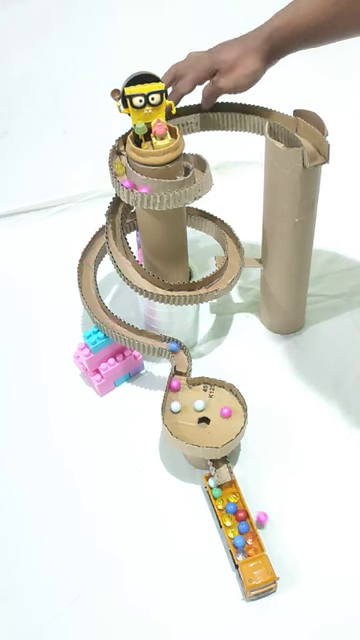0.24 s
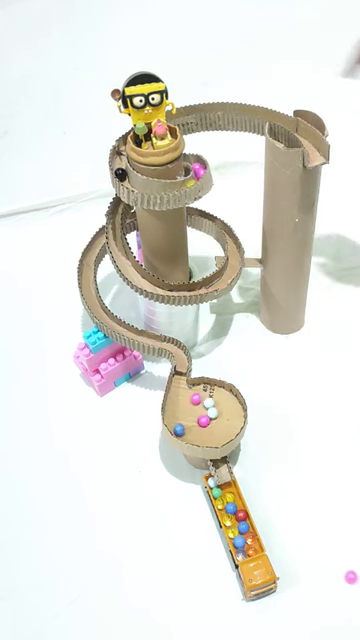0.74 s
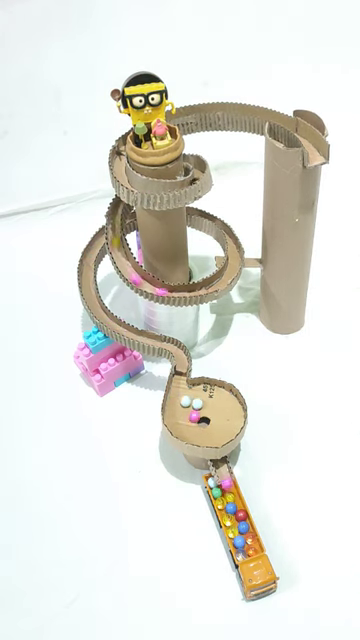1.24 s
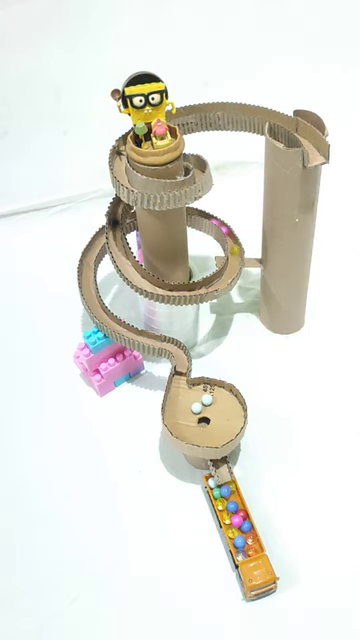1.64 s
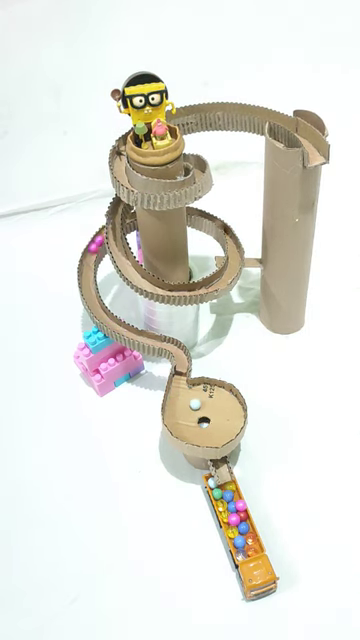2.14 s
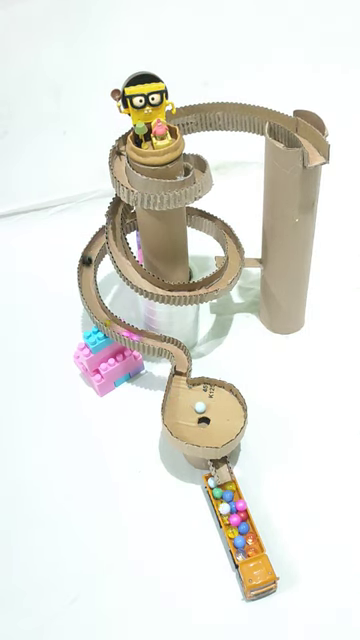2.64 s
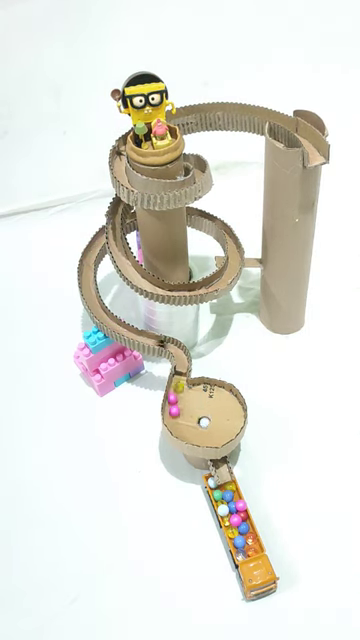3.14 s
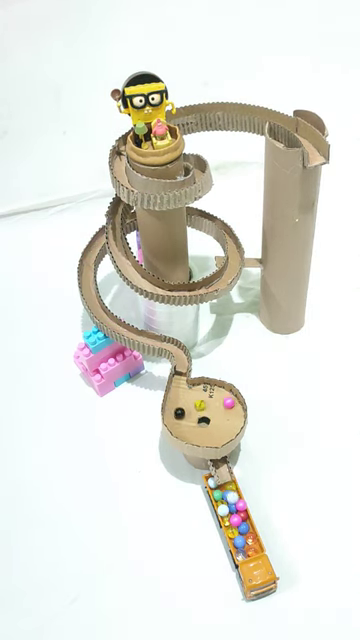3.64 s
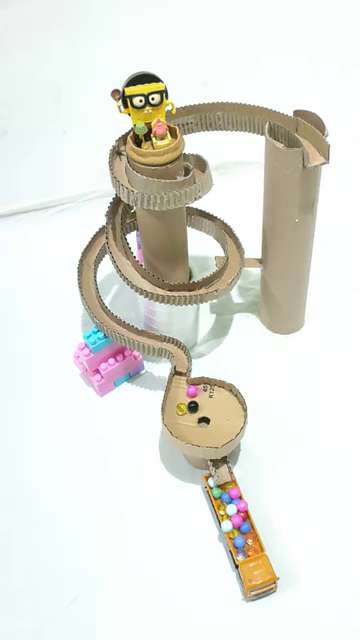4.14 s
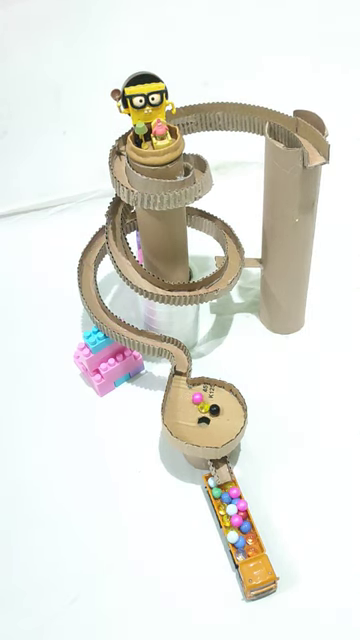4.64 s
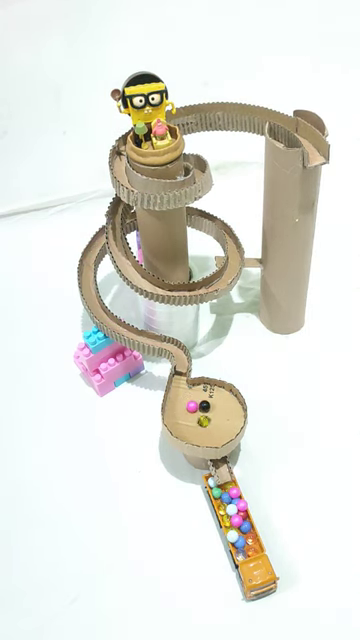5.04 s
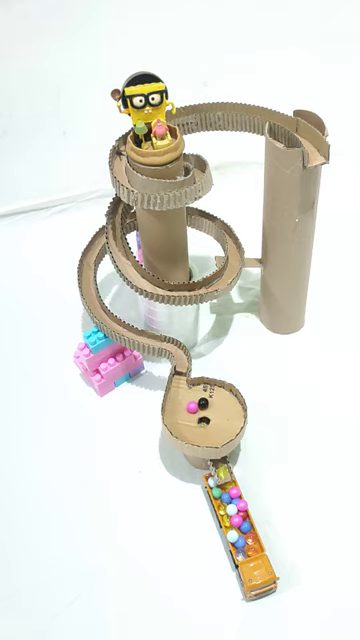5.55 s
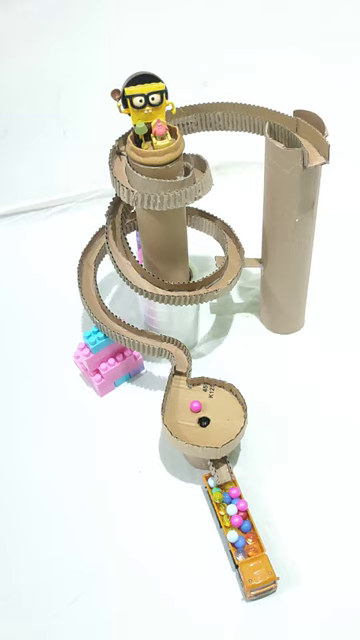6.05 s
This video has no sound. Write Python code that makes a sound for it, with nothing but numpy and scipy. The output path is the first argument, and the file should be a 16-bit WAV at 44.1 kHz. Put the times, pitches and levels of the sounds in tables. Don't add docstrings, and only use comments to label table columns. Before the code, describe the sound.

Bright marble clacks and rattles in a plastic toy truck, over soft cardboard rolling and bowl thumps that thin out in a bare, echoing room.

```python
import sys
import numpy as np
from scipy import signal
from scipy.fft import rfft, irfft, next_fast_len
from scipy.io import wavfile
from scipy.ndimage import uniform_filter1d

SR = 44100
rng = np.random.default_rng(int(sys.argv[2]) if len(sys.argv) > 2 else 0)


def wav_record(signal):
    frames = np.transpose(np.atleast_2d(signal))
    bounded = np.clip(frames, -1, 1)
    quanta = np.round(bounded * 32767).astype(np.int16)
    wavfile.write(sys.argv[1], SR, quanta)


def level_to_linear(level):
    exponent = np.asarray(level, float) / 20
    return 10 ** exponent


N = 276933

# [t/s, level/dB, truck bed share/dB, glass share/dB, share sent into the room/dB]
LANDINGS = [(0.0313, -9.5, -7.5, -9.5, -7.5), (0.1723, -15.5, -7, -15.5, -3), (0.2289, -12, -6, -9, -7),
            (0.2873, -13.5, -13.5, -13, -2.5), (1.4163, -11.5, -10.5, -10, -3),
            (1.4874, -11.5, -9.5, -13.5, -2.5), (1.6976, -9.5, -11, -9.5, -3.5),
            (1.9883, -14.5, -13, -10.5, -3), (2.0473, -14.5, -6.5, -9, -5), (2.1181, -14.5, -14, -12, -1),
            (2.625, -12, -12, -12, -6), (2.7309, -15.5, -9.5, -15, -2.5), (3.7474, -17.5, -9, -7, -4),
            (4.1023, -13.5, -16.0, -11.5, -3), (4.7144, -24.0, -27, -16, -2.5),
            (5.7396, -13.5, -22, -9.5, -3), (5.7945, -8, -14.5, -22, -6), (6.0142, -20, -18, -15.5, -4.5)]
# [t/s, level/dB, truck bed share/dB, glass share/dB]
BOUNCES = [(0.0587, -29, 1.5, -3), (0.1195, -18.0, -8, -15.5), (0.1827, -21.5, -7, -9),
           (0.2114, -23.5, -8.5, -12), (0.2421, -22.5, -6.5, -14.0), (0.2607, -17, -29, -19),
           (0.424, -27, -9.5, -14.5), (1.4393, -30.5, 2, -1), (1.523, -19.0, -9, -7.5),
           (1.538, -28, -8, -10.5), (1.57, -29.5, -6, -11), (1.5972, -24.5, -4.5, -9),
           (1.7192, -20.5, -12, -10), (1.759, -19, -17, -17), (1.7973, -19.5, -7.5, -16),
           (2.0901, -18.0, -13, -14), (2.6712, -17, -13, -11), (2.6942, -23.0, -9, -13),
           (2.8127, -31.5, -8, -11), (3.7733, -13, -16, -17.5), (3.8082, -24.5, -2.5, -3.5),
           (3.8586, -43, 0.5, -5.0), (4.1347, -16.5, -19, -12), (4.1604, -22, -8.5, -13),
           (4.1904, -16.5, -12.5, -20), (4.2259, -21.5, -10, -12), (4.8221, -36, -4, -13),
           (5.81, -18.5, -16, -15), (5.8233, -25.5, -16, -8.5), (5.9205, -35, 1.5, -15)]
# [t/s, level/dB]
RATTLES = [(0.11, -32.5), (0.1409, -37.0), (0.1561, -36.5), (0.1674, -14), (0.3107, -26), (0.3387, -24),
           (1.7409, -29), (2.0699, -28), (2.1345, -24), (2.1706, -33), (2.6373, -25), (2.7439, -32),
           (2.7654, -21), (2.7889, -38), (2.8406, -42.5), (3.7901, -33.5), (3.8017, -17.5), (3.8408, -17.5),
           (3.8947, -24.5), (4.1192, -18.5), (4.1485, -30.5), (4.1665, -20), (4.2078, -20), (4.261, -26),
           (5.754, -21), (5.8503, -35), (5.9523, -39.0), (6.054, -35)]
# [t/s, level/dB, cardboard share/dB]
KISSES = [(0.4, -26.5, -8), (0.656, -30.5, -13), (0.78, -31, -21), (0.7998, -39, -5), (1.124, -48.5, 10.5),
          (1.391, -39.5, 2), (1.67, -32.5, -15), (1.958, -33.5, -13), (2.381, -37.5, -10),
          (2.609, -45.5, -1.5), (3.0603, -38, -22.5), (3.486, -40.0, -8.5), (3.5224, -39, -28.5),
          (3.614, -41.5, -10), (3.718, -33.5, 2.5), (3.9885, -34.0, -10.5), (4.441, -38, -22),
          (4.5832, -45, -11), (5.162, -41, -9.0)]
# [t/s, level/dB]
GRAZES = [(0.5899, -54), (0.7511, -48), (0.9445, -45), (1.2531, -46), (1.3753, -40), (1.9359, -44.5),
          (2.37, -49), (2.4147, -45.5), (2.4587, -45), (2.5217, -51), (2.9999, -48), (3.3622, -47)]


def contacts():
    bounce_room_db, rattle_room_db, kiss_room_db, tick_room_db = -1.5, -4, -4, -4.5
    rows = [tuple(row) for row in LANDINGS]
    rows += [(*row, bounce_room_db) for row in BOUNCES]
    rows += [(s, db - 7.5, -13, -16.5, rattle_room_db) for s, db in RATTLES]
    rows += [(s, db + paper_db, -30, -11 - paper_db, kiss_room_db) for s, db, paper_db in KISSES]
    ticks = list(GRAZES)
    tick_late_s = 0.0013
    ticks += [(s + tick_late_s, db + tick_db) for s, db, _, tick_db in THUMPS]
    rows += [(s, db + 6, -9.5, -17.5, tick_room_db) for s, db in ticks]
    return np.transpose(rows)


# [f/Hz, level/dB, time to fade by 60 dB/s]
TRUCK_BED = [(1330, -3, .006), (1500, 1, .009), (1680, 2, .01)]
# [f/Hz, level/dB, time to fade by 60 dB/s]
TRUCK_WALLS = [(2000, -3, .004), (2400, -1, .004), (2850, 1, .0045), (3300, 0, .004), (3800, -2, .0035),
               (4400, -5, .003)]
# [f/Hz, level/dB, time to fade by 60 dB/s]
GLASS = [(5476, 0.5, 0.0022), (6350, 2, 0.0028), (6840, 4.5, 0.0021), (8710, -1.5, 0.0017),
         (9650, -3.5, 0.00089), (11210, -2, 0.0012), (12950, -1, 0.00095)]


def clacks():
    s, db, bed_db, glass_db, room_db = contacts()
    lasting = np.clip((db + 45) / 22, .45, 1)[:, None, None]
    hits = strike(s, db + bed_db + 2.5, TRUCK_BED, 2.2, 0.025, turns=0.63, lasting=lasting, room_db=room_db)
    hits += strike(s, db - 3.0, TRUCK_WALLS, 1.5, .03, turns=0.32, lasting=lasting ** .5, room_db=room_db)
    hits += strike(s, db + glass_db + 7.5, GLASS, 1.42, 0.026, turns=0.27, room_db=room_db)
    towards_phone_db, into_room_db = 0, -6
    snaps = cracks(s, db - 11) * level_to_linear([[towards_phone_db], [into_room_db]])
    return steep(hits, 1197, 20000) + snaps


def cracks(times, peak_db):
    fade_s = .0012
    starts = np.zeros(N)
    np.add.at(starts, (times * SR).astype(int), level_to_linear(peak_db))
    fade = signal.lfilter([1], [1, -np.exp(-1 / (fade_s * SR))], starts)
    return band(fade * rng.standard_normal(N), 4200, 3.8)


def strike(times, peak_db, modes, scatter_db, detune, favour_db=0, turns=2, lasting=1, room_db=0, flip=np.pi):
    hz, db, t60 = np.transpose(modes)[:, None, :, None]
    t = np.arange(int(min(t60.max(), .15) * SR)) / SR
    chance = rng.standard_normal((len(times), len(modes), 3))
    gain = level_to_linear(db + favour_db + scatter_db * chance[..., :1])
    pitch = hz * (1 + detune * chance[..., 1:2])
    phase = 2 * np.pi * pitch * t + turns * chance[..., 2:]
    phase += flip * np.arange(len(modes))[:, None]
    fade = np.exp(-np.log(1000) * t / (t60 * lasting))
    blows = (gain * fade * np.sin(phase)).sum(axis=1)
    blows *= (level_to_linear(peak_db) / np.abs(blows).max(axis=1))[:, None]
    out = np.zeros((2, N + len(t)))
    for s, blow, wet in zip(times, blows, level_to_linear(room_db + 0 * times)):
        start = int(s * SR)
        out[:, start:start + len(t)] += blow * np.array([[1], [wet]])
    return out[:, :N]


def band(x, hz, octaves):
    edges = hz * 2 ** (np.array([-.5, .5]) * octaves)
    edges = np.minimum(edges, SR / 2 * .95)
    return signal.sosfilt(signal.butter(2, edges, "band", fs=SR, output="sos"), x)


def steep(x, lo_hz, hi_hz):
    return signal.sosfilt(signal.butter(5, [lo_hz, hi_hz], "band", fs=SR, output="sos"), x)


# [t/s, level/dB, strongest f/Hz, contact tick against the bump/dB]
THUMPS = [(0.016, -40, 581.0, -9.0), (0.119, -40.5, 651.0, -11), (0.156, -42, 576.0, -19),
          (0.352, -31.5, 571.0, -17.5), (0.536, -41, 624.0, -28), (0.553, -32, 574, -8),
          (0.593, -51.5, 571.0, -6), (0.672, -49, 627.0, -20.5), (0.827, -56, 581.0, 2),
          (0.906, -52, 560.0, -9), (0.985, -30.0, 659.0, -8.5), (1.129, -47.5, 587.0, -12),
          (1.191, -47, 565.0, -22.0), (1.304, -30, 553, -4.5), (1.493, -30, 444.0, -12.5),
          (2.241, -33.5, 651.0, -10), (3.079, -30.5, 583, -7), (3.144, -39.5, 447.0, -18),
          (3.155, -33, 638.0, -6), (3.199, -39.5, 560, -7.5), (3.243, -35, 581.0, -7),
          (3.296, -29.5, 580, -13.5), (3.511, -32.5, 638.0, -12.5), (3.562, -35.5, 633.0, -6),
          (3.677, -41.5, 643.0, -8.5), (3.717, -30, 654.0, -11.5), (5.246, -35, 651.0, -10.5),
          (6.128, -56, 620, -19.5), (6.184, -32.5, 625, -13.5), (6.217, -43, 565.0, -9)]
# [f/Hz, level/dB, time to fade by 60 dB/s]
BOWL = [(369, -8, 0.027), (459.4, 4.5, 0.1), (530, 3, 0.032), (548, -2.5, 0.21), (602.5, -13.5, 0.037),
        (637, 9, 0.093), (715, -12.5, 0.15), (569, 14.5, 0.025)]


def thumps():
    s, db, hz, _ = np.transpose(THUMPS)
    hop_s, hop_db, hop_pitch = 0.013, -10, .86
    s = np.append(s, s + hop_s)
    db = np.append(db, db + hop_db)
    hz = np.append(hz, hz * hop_pitch)
    octaves_off = np.abs(np.log2(hz[:, None] / np.array(BOWL)[:, 0]))
    favour_db = -12 * octaves_off[..., None]
    blows = strike(s, db + 1.5, BOWL, 1.7, 0.019, favour_db, turns=0.52, flip=0)
    return steep(blows, 294, 840)


# [t/s, on the track level/dB, circling the bowl level/dB, scuffing the paper level/dB]
ROLL = [(0, -63.5, -62.5, -47), (.45, -65.5, -61, -67), (.75, -63.5, -80, -64), (1.15, -67, -71, -60),
        (1.55, -61.5, -62.5, -59), (1.9, -64.5, -73.5, -61.5), (2.3, -64.5, -65.5, -64),
        (2.8, -70, -73, -67), (2.96, -65, -62.5, -63), (3.3, -78, -64, -67.5), (3.42, -80, -67.5, -81.5),
        (3.7, -74, -70, -71.5), (4.08, -75.5, -64.5, -68.5), (4.32, -85.5, -85, -79),
        (5.0, -87.5, -88.5, -91), (5.45, -94, -86, -90), (5.68, -93, -68, -83.5), (5.95, -89, -83, -85)]
# [f/Hz, level/dB, time to fade by 60 dB/s]
TRACK = [(115, -7, 0.013), (160, -15, 0.018), (207.5, -4.5, 0.041), (260.6, 1.5, 0.14), (294.3, -11, 0.033)]


def rolling():
    s, *columns = np.transpose(ROLL)
    t = np.arange(N) / SR
    track, bowl, scuff = (level_to_linear(np.interp(t, s, column)) for column in columns)
    hum = unit(ring(grains(600, 0.98), TRACK))
    circling = unit(steep(ring(grains(500, 2.9), BOWL), 386, 770))
    grit = unit(band(grains(400, 4.8), 1900, 2.4))
    hiss = unit(band(grains(790, 4), 7200, 0.92))
    out = track * level_to_linear(1.1 * walk(13) + 2.0) * hum
    out += bowl * level_to_linear(2 * walk(17) + 2.0) * circling
    out += scuff * level_to_linear(1.6 * walk(9.4) - 1) * grit
    out += scuff * level_to_linear(1.5 * walk(7.8) - 10.5) * hiss
    return out


def grains(rate, spread):
    hits = rng.random(N) < rate / SR
    size = level_to_linear(spread * np.minimum(rng.exponential(size=N), 4))
    return hits * size * rng.choice([-1, 1], N)


def ring(x, modes):
    out = 0
    for hz, db, t60 in modes:
        r = 1000 ** (-1 / (t60 * SR))
        resonance = [1, -2 * r * np.cos(2 * np.pi * hz / SR), r * r]
        out = out + level_to_linear(db) * (1 - r) ** .5 * signal.lfilter([1, 0, -1], resonance, x)
    return unit(out)


def walk(rate):
    k = int(SR / rate)
    steps = np.repeat(rng.standard_normal(N // k + 1), k)
    return unit(uniform_filter1d(uniform_filter1d(steps, k), k)[:N])


def unit(x):
    return x / np.sqrt(np.mean(x ** 2))


# [t/s, level/dB]
NEAR = [
    [(.0007, -2.5), (.0015, -21.5), (.0024, -10.5)],
    [(.0005, -13.5), (.0017, -6.5), (.0021, -21.5)],
]


def near_echoes(hard):
    return np.array([sum(level_to_linear(db) * np.roll(hard[0], int(s * SR)) for s, db in port) for port in NEAR])


# [f/Hz, level/dB, time to fade by 60 dB/s]
ROOM = [(285, -9, 0.43), (616, -23, 0.14), (1147, -5.5, 0.34), (2575, -5.5, 0.38), (4640, -3.5, 0.4),
        (9050, -2.5, 0.33), (13600, -25.5, 0.54)]


def room(x):
    patterns, pattern_s = 5, .11
    t = np.arange(int(.6 * SR)) / SR
    pattern = np.repeat(rng.integers(patterns, size=int(N / SR / pattern_s) + 2), int(pattern_s * SR))[:N]
    out = 0
    for k in range(patterns):
        lumps = level_to_linear(4.0 * np.exp(-t / .07) * walk(600)[:len(t)])
        tail = 0
        for hz, db, t60 in ROOM:
            shared, own = band(rng.standard_normal((2, len(t))), hz, 0.98)
            alike = np.clip(.88 - hz / 6000, .15, 1)
            ports = np.array([shared, alike * shared + np.sqrt(1 - alike ** 2) * own])
            onset = np.clip((t - .002) / 0.00061, 0, 1)
            fade = np.exp(-np.log(1000) * t / t60) * onset
            tail = tail + level_to_linear(db - 21) * lumps * fade * ports
        here = uniform_filter1d(1. * (pattern == k), size=200)
        out = out + signal.fftconvolve((x * here)[None], tail, axes=1)[:, :N]
    return out


# [f/Hz, level/dB per Hz]
AIR = [(24, -9.5), (95, -21.5), (219, -24.5), (500, -35), (4710, -46.5), (9500, -58), (13800, -42.5),
       (14800, -59.5)]


def air():
    hz, db = np.transpose(AIR)
    out = 0
    for f in 32 * 2 ** np.arange(0, 9.1, .5):
        mid, side = band(rng.standard_normal((2, N)), f, 0.38)
        wide = .6 if 100 < f < 900 else .8
        level = level_to_linear(np.interp(np.log(f), np.log(hz), db) + 2 * walk(5.4))
        out = out + level * (mid + wide * side * np.array([[1], [-1]]))
    return unit(out) * level_to_linear(-65.5)


# [f/Hz, left minus right level/dB]
PORTS = [(60, -2.5), (150, 0), (600, -.4), (1200, -1.2), (2500, -2.8), (5000, -2.7), (8500, .5),
         (13000, -1)]


def hear(sound):
    lag = 5.42
    size = next_fast_len(N)
    f = np.fft.rfftfreq(size, 1 / SR) + 1
    hz, db = np.transpose(PORTS)
    shade = level_to_linear(np.interp(np.log(f), np.log(hz), db) / 2)
    delay = np.exp(-2j * np.pi * f / SR * lag)
    left = irfft(rfft(sound[0], size) * shade * delay, size)
    right = irfft(rfft(sound[1], size) / shade, size)
    return np.array([left, right])[:, :N]


def scene():
    hard = clacks()
    roll_room_db = -5.5
    toy, sent = hard + thumps() + rolling() * level_to_linear([[0], [roll_room_db]])
    return hear(toy + near_echoes(hard) + room(sent) + air())


def low_pass(x):
    return signal.sosfilt(signal.butter(12, 15600, fs=SR, output="sos"), x)


def record(dry):
    mix = signal.sosfilt(signal.cheby2(7, 40, 15500, fs=SR, output="sos"), dry)
    return low_pass(mix)


dry = scene()
out = record(dry)
wav_record(out)
```